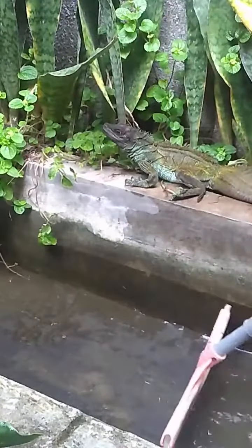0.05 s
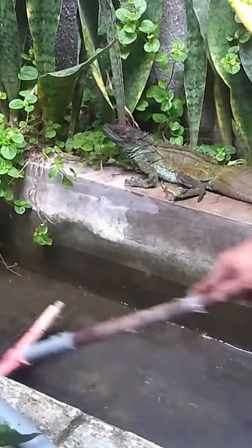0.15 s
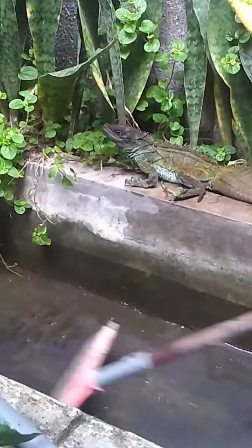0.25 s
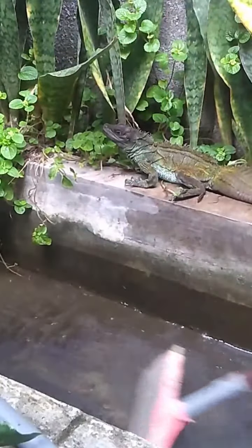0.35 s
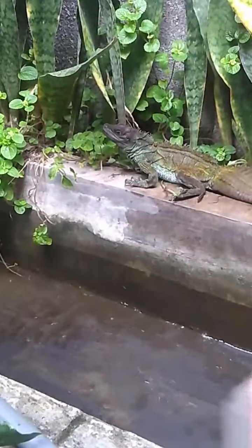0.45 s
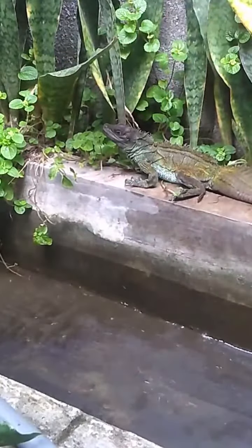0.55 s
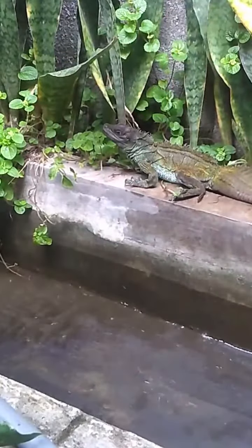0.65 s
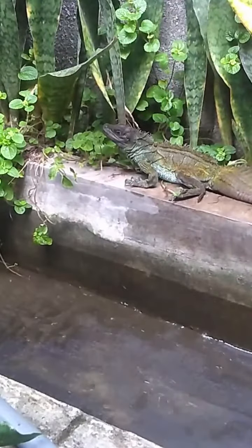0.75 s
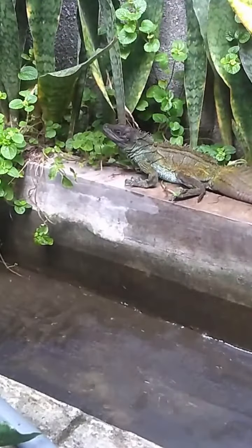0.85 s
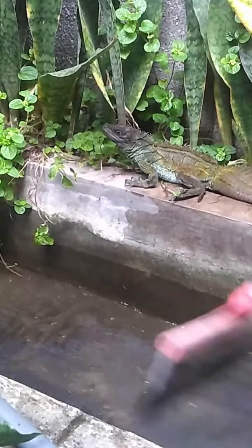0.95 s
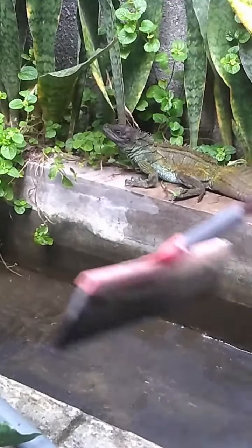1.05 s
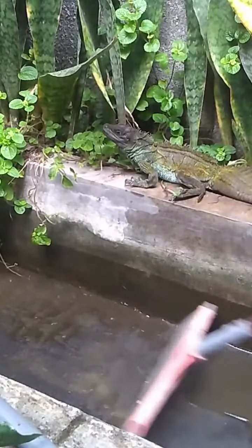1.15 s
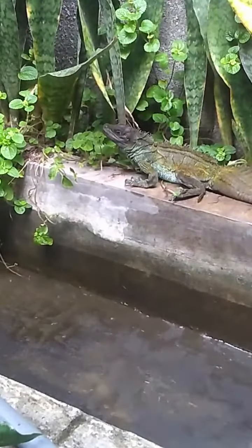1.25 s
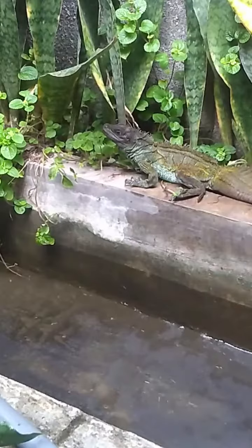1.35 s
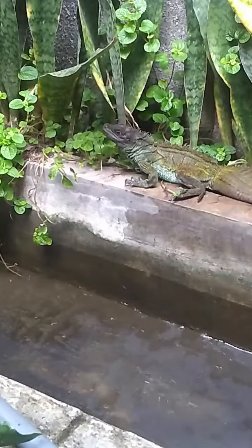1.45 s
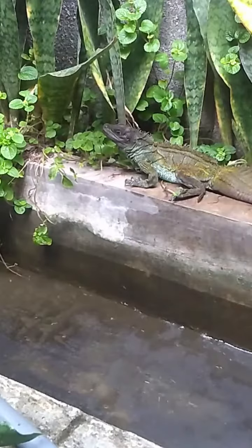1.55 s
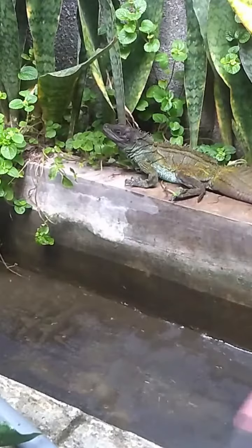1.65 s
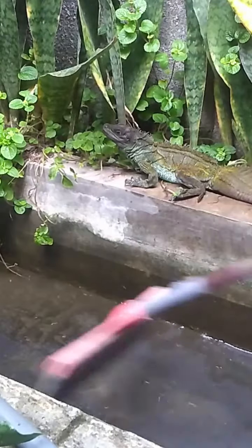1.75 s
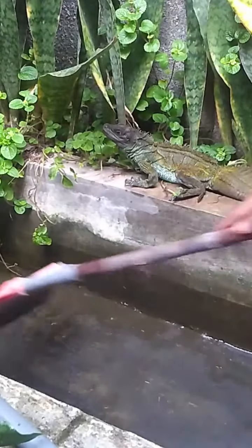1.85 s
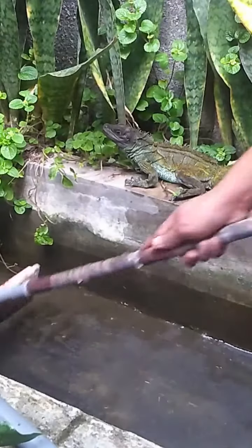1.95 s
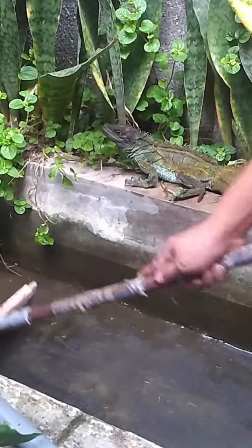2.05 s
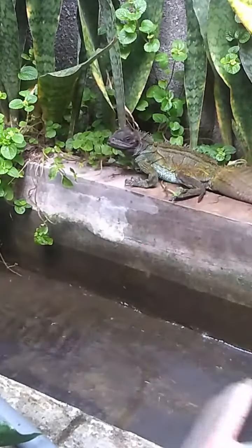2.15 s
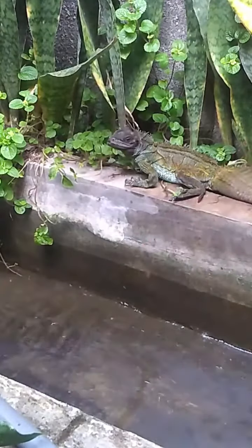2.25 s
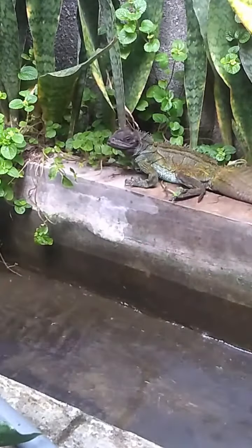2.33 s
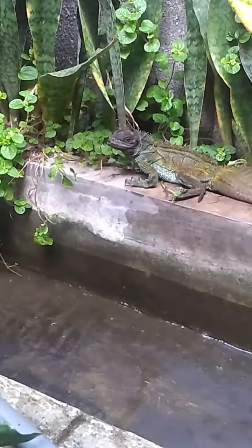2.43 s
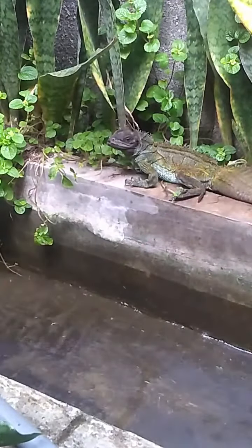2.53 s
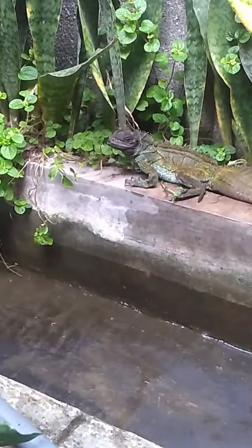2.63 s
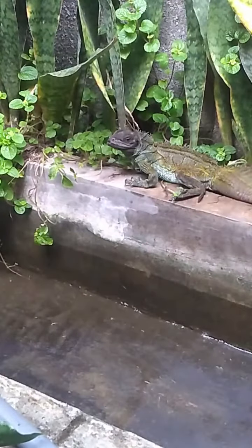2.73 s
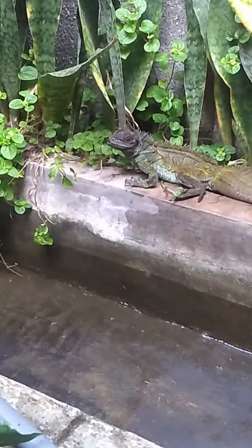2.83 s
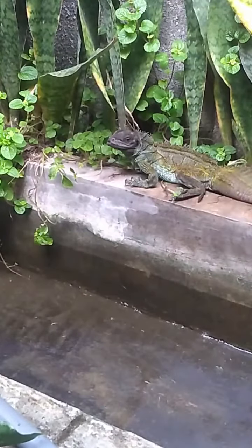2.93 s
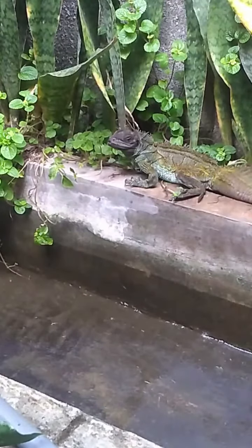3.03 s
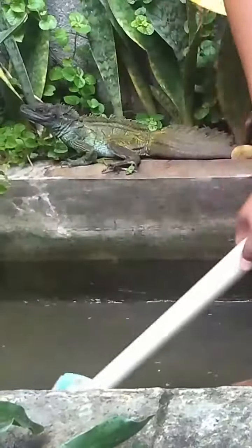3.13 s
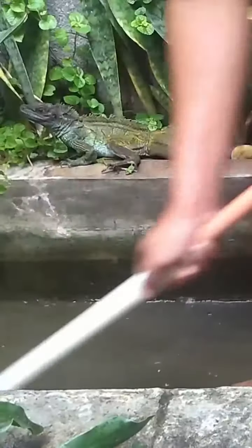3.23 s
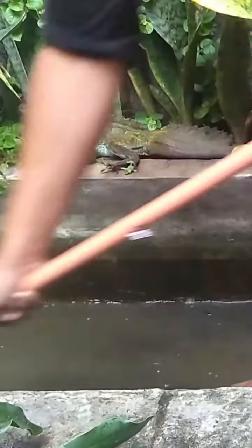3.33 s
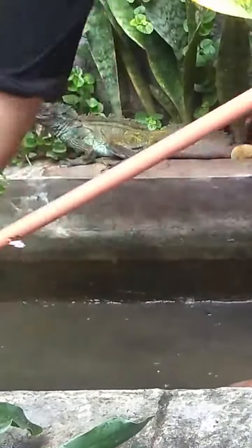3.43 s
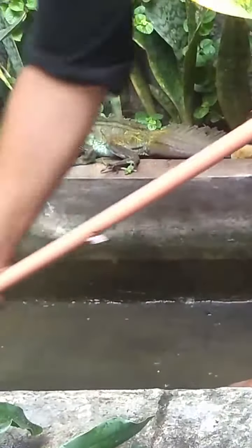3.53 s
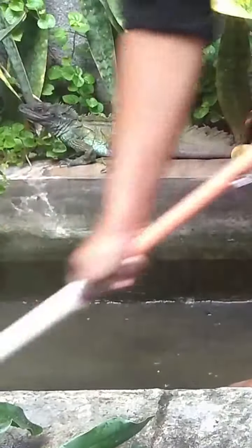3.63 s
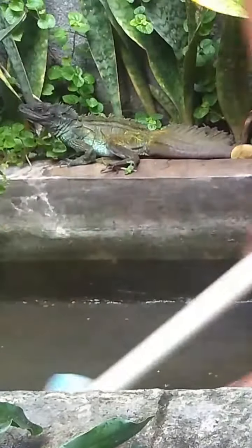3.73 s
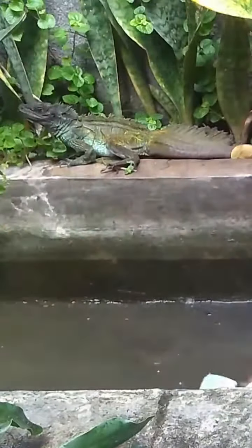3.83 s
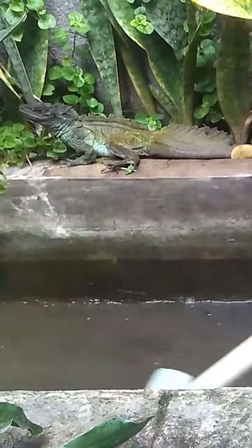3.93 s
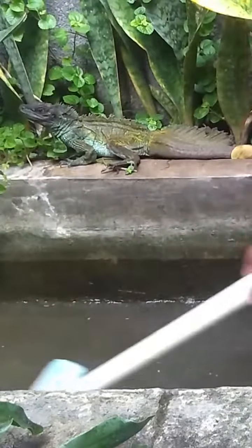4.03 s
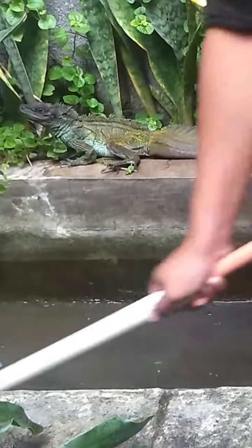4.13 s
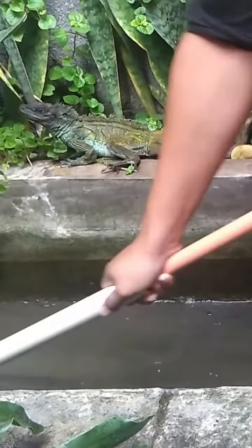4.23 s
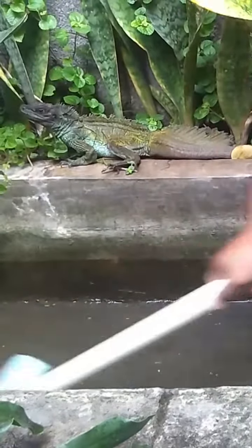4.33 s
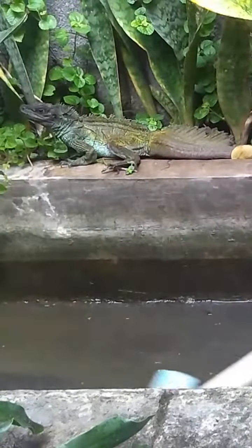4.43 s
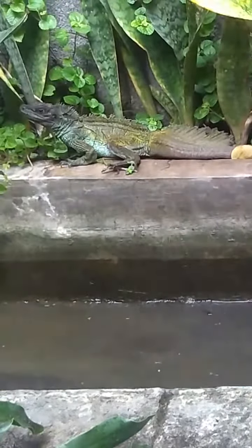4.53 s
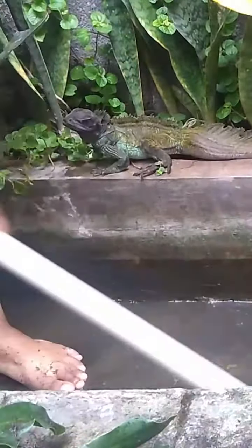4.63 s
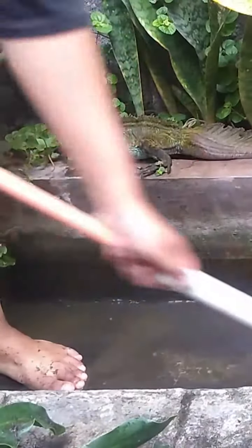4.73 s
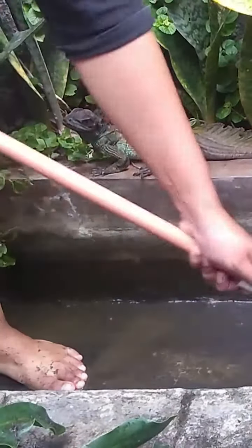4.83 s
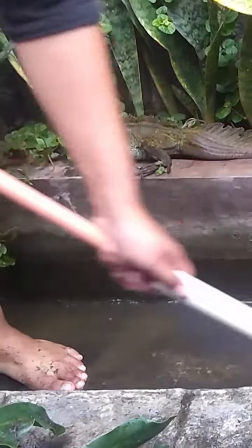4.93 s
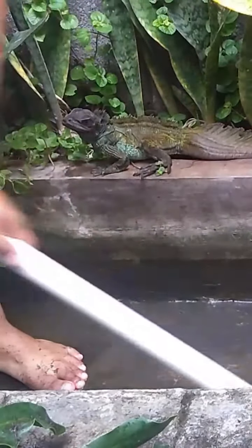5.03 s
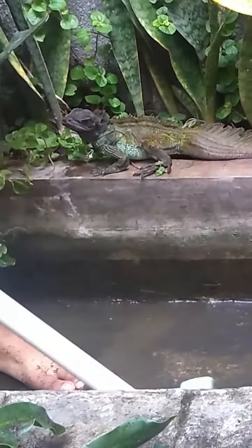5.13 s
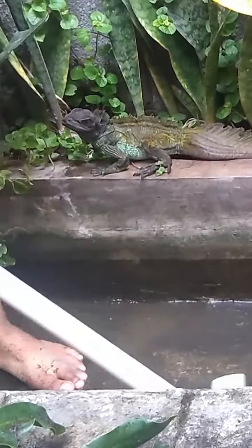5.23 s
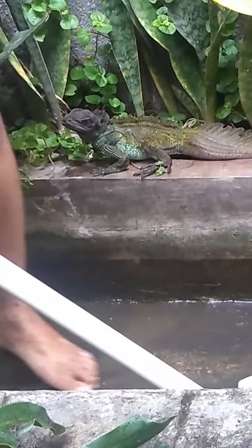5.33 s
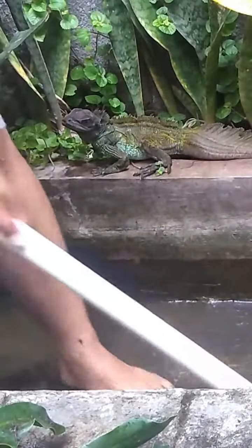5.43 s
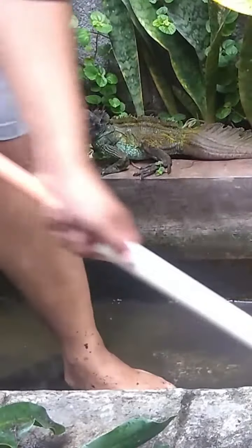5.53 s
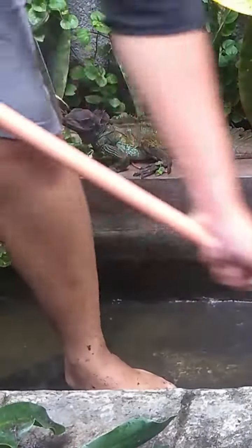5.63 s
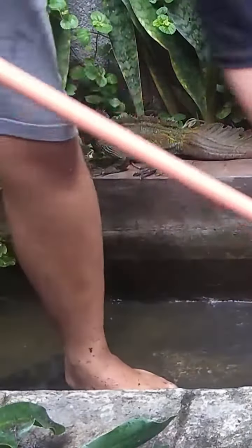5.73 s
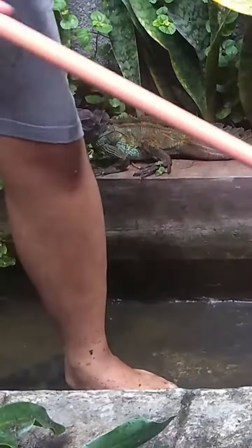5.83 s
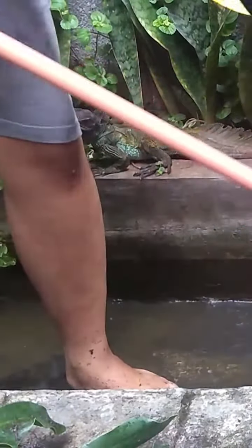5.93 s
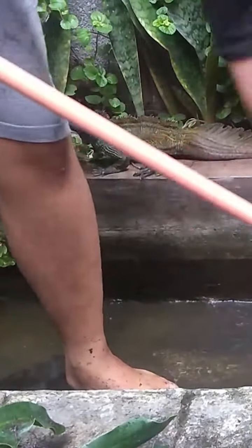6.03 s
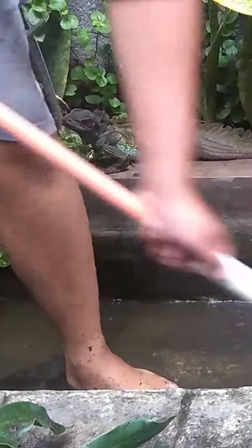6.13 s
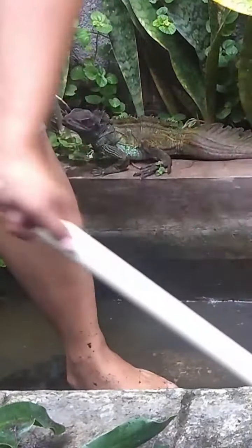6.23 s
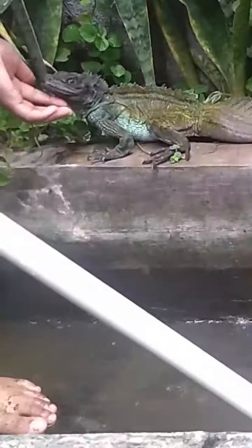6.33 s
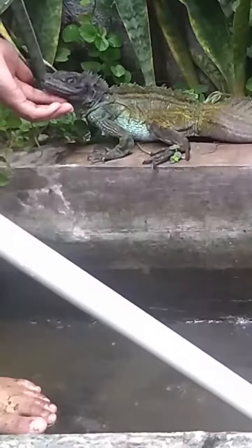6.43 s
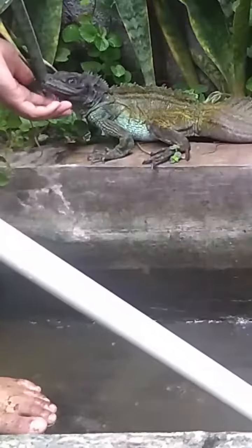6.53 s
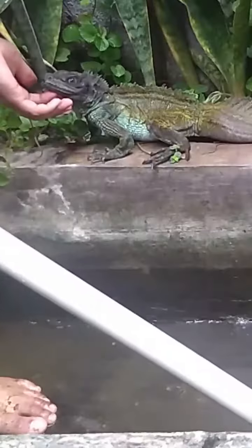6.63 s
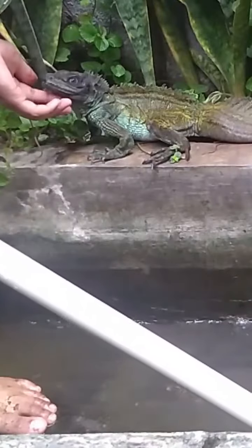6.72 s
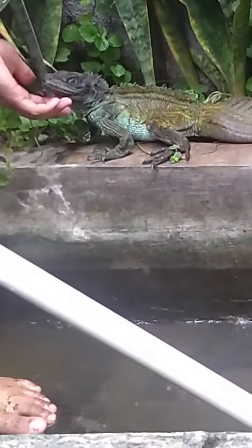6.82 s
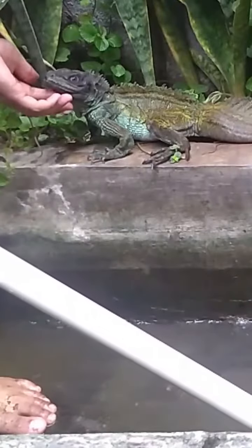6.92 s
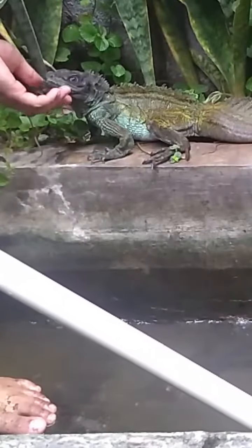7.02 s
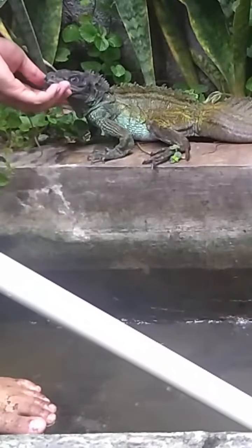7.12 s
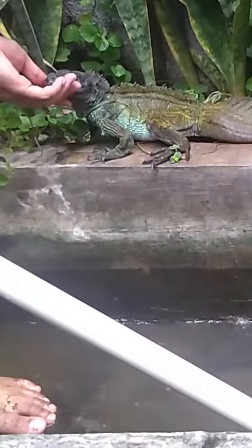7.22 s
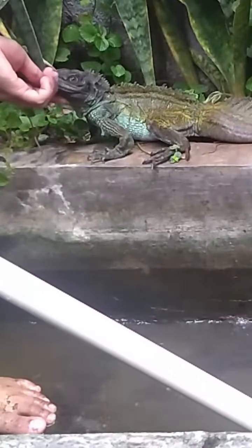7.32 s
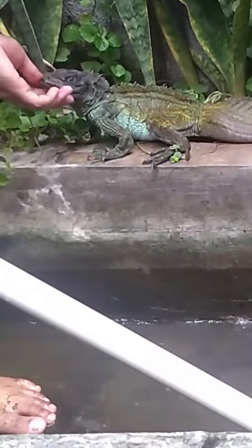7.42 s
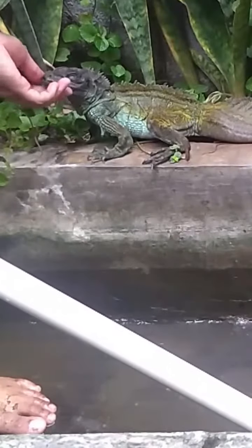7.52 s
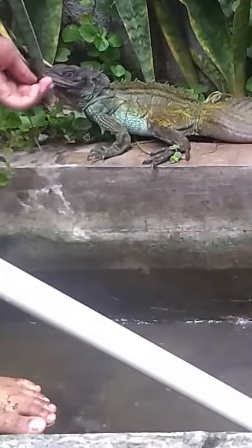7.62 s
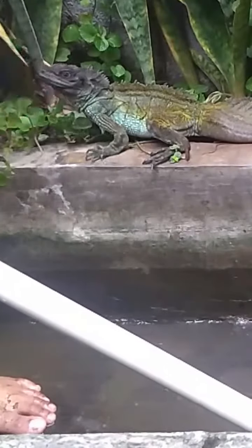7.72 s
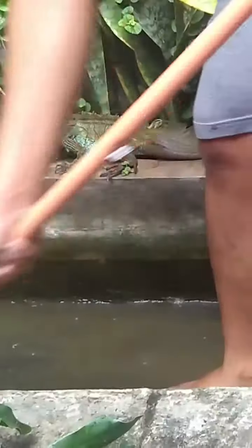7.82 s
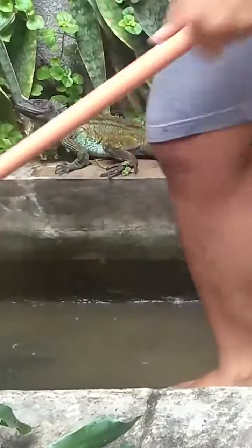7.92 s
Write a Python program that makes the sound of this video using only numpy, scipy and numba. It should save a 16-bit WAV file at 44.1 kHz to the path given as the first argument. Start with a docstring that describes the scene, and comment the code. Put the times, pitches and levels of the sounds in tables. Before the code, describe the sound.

Rough scratching ticks and gritty drags come first, broken by a bright water slap, dull head knocks and low trough rumble. Brief near-silent gaps separate the passages. Then cleaner, bristly swishes scrub wet concrete back and forth, very close to the microphone. A long faint hush follows, with soft rumbling and light taps, before a sudden final rasp.

```python
"""Dense scratching ticks are heard first, with drags, knocks and splashes over a low boom.
A long-handled scraper blade, then a brush, works over the wet concrete of a drained pond near two microphone ports.
Random impulses stand for stick-slip; filtered noise excites the head, the handle, the water and the trough.
The sound comes in passages separated by brief, nearly silent gaps."""
import sys
import numpy as np
from scipy import signal
from scipy.fft import rfft, irfft, next_fast_len
from scipy.io import wavfile
from scipy.ndimage import uniform_filter1d
from numba import njit

SR = 44100
rng = np.random.default_rng(int(sys.argv[2]) if len(sys.argv) > 2 else 0)


def wav_record(signal):
    """Record a signal, one row per channel, as 16-bit PCM in the file named by sys.argv[1]."""
    frames = np.transpose(np.atleast_2d(signal))
    bounded = np.clip(frames, -1, 1)
    # unit amplitude maps onto the largest positive 16-bit level
    quanta = np.round(bounded * 32767).astype(np.int16)
    wavfile.write(sys.argv[1], SR, quanta)


N = 351477

# Strokes of the blade, then of the brush: (landing time [s], hiss on landing [dB], swell [s], top hiss [dB],
# hold [s], fall [dB/s], strongest rasp over hiss [dB], place of that rasp [share of stroke],
# drag over hiss on landing [dB], drag over hiss at the end [dB], port balance [dB, quarter to each port])
STROKES = [ (0.0, -52, 0.028, -56, 0.049, 150, 5.5, 0.32, -2.5, -6, -5),
           (.125, -54, 0.05, -32, 0.0039, 44.4, 2, 0.49, -1, 15, 3.5),
           (0.488, -39, 0.015, -40, 0.018, 61, -11, 0.07, 8, -14, -4.5),
           (.56, -49.5, 0.16, -40, 0.064, 49.6, -14.5, .05, -2, -22, -2),
           (.98, -54.5, 0.097, -52, 0.0031, 706, 12.5, 0.58, 8, 25.5, 3.5),
           (1.157, -49, 0.12, -46.5, 0.03, 110, -2, 1, -8, 0, -7),
           (1.373, -58.5, 0.21, -38.5, 0.035, 200, -6, 0.15, 1.5, -13, -0.5),
           (1.64, -39, 0.0061, -36.5, 0.032, 178, 1, 0.71, -5, 0.5, 2),
           (1.78, -57, 0.033, -61, 0.07, 150, 3, .4, 2.5, 1.5, -2),
           (1.93, -48.5, 0.008, -49.5, .01, 80, 1.5, 0.41, -2, 2, -6),
           (2.059, -75, 0.036, -46, 0.0018, 900, -14, .05, -12, -6, -12),
           (2.155, -61, 0.028, -38, 0.026, 110, -13, 0.87, 4, -1, -1),
           (2.28, -50.5, 0.12, -48, .005, 200, -4, 0.32, 6.5, 2.5, -2.5),
           (2.431, -47.5, 0.13, -39, .005, 200, -0.5, 0.5, 6.5, 5.5, -2),
           (2.6, -52.5, 0.074, -46.5, .01, 200, -3, .05, -6, -6, -6),
           (2.705, -44.5, 0.014, -39, 0.0084, 171, -17, .8, -3.5, -3, -4),
           (2.801, -53, 0.062, -28.5, 0.027, 400, 2, 0.62, -31, 3, 4.5),
           (2.929, -50.5, 0.072, -46.5, 0.004, 196, 8, .1, -0.5, -3.5, 1),
           (3.125, -39.5, 0.0038, -33.5, 0.044, 207, -2.5, 0.65, -15.5, -7.5, -2),
           (3.282, -45.5, 0.07, -29, 0.1, 177, -5, 0.76, -11, -36, -3),
           (3.587, -47, 0.17, -30.5, 0.0045, 103, -10, 0.72, -13.5, -21, -4.5),
           (3.84, -43, 0.043, -34, 0.022, 287, 1.5, 0.74, -24.5, 0.5, -0.5),
           (4.007, -46, 0.059, -38, 0.11, 199, -5, 0.29, -14.5, -11.5, -3),
           (4.2, -41, 0.1, -36.5, 0.0091, 190, -9, 0.15, -10.5, -19, -3.5),
           (4.384, -40.5, 0.14, -34, .03, 453, -13, 0.78, -16, -12.5, -4),
           (4.624, -41, 0.077, -31, 0.18, 168, -2, 0.58, -12.5, -29.5, -1.5),
           (4.985, -41, 0.06, -39, 0.05, 150, -9, .5, -13, -11, -3),
           (5.1, -46, .045, -33.5, .095, 210, -9, .9, -14, -10, -2),
           (5.289, -57.5, 0.033, -44, 0.039, 108.6, -9, 0.55, -11, -7.5, -2),
           (5.477, -46.5, 0.27, -29.5, 0.18, 175, -4.5, 0.55, -10, -22, -1.5),
           (6.035, -39, 0.061, -33.5, 0.17, 890, -13, 0.81, -11, -20, -4),
           (7.828, -38.5, 0.082, -24, 0.028, 100, -9.5, 0.45, -12.5, -33, 0), ]
# Faint hiss while the brush rests: (time [s], hiss [dB], drag over hiss [dB],
# port balance [dB, quarter to each port])
RESTING = [(6.33, -95.5, -1.5, 2), (6.39, -85, -4, 0), (6.465, -87, 1.5, -2), (6.48, -77, 2, -2.5),
           (6.52, -75, 1.5, -2), (6.65, -79, 1, -1), (6.69, -87, 1.5, -0.5), (6.728, -86, -0.5, -0.5),
           (6.74, -75, 0.1, -0.5), (6.79, -73.5, -2, -1), (6.91, -85.5, -3.5, 1.5), (7.01, -71.5, -2.5, 1),
           (7.13, -78, 0, -2.5), (7.224, -71.5, -0.5, -2), (7.436, -66, -5.5, 6), (7.542, -71, 2, -3),
           (7.62, -64, 2, 12), (7.708, -71.5, -13, 18), (7.748, -67.5, -13, 5.5), (7.79, -88, -7, -0.5)]
# Spectrum of the bristle slips: (frequency [Hz], relative level [dB])
BRISTLE_SPECTRUM = [(1350, -32.5), (2200, -2.5), (2750, 4.5), (3130, 2.5), (4300, 3.5), (7160, -1.5),
                    (11700, -10.5), (14900, -25), (15600, -41), (16000, -81)]
# Spectrum of the blade's crackle: (frequency [Hz], relative level [dB])
BLADE_SPECTRUM = [(1200, -40), (1900, -7), (2600, -0.5), (3100, -4), (3720, -3), (4650, -5), (5480, -5.5),
                  (8460, -9.5), (11300, -16), (13900, -24.5), (14900, -33), (16000, -43)]
# Spectrum of the head dragging through grit: (frequency [Hz], relative level [dB])
DRAG_SPECTRUM = [(250, -54), (420, -18.5), (572, 2), (804, 3), (949, -8), (1110, 0), (1500, -4),
                 (1950, -12.5), (3300, -60)]
# Resonances of the head: (frequency [Hz], width before broadening [Hz], relative level [dB])
HEAD_MODES = [(225.7, 33, -4.5), (372.4, 27, -4.5), (483.5, 45, 1), (651, 30, 4), (821, 16, -2.5),
              (890, 50, -2.5), (970, 165, 0), (1069, 11, 5), (1371, 58, -3), (1522, 47, -2.5)]
# Head knocking and juddering on concrete: (time [s], peak [dB], centre of the ring [Hz],
# t60 of the contact [s], fall away from the centre [dB/octave])
KNOCKS = [(.114, -39.5, 1550, 0.031, 38.5), (.429, -20, 455, 0.13, 43), (.468, -21, 482, 0.26, 31),
          (.519, -23.5, 810, 0.072, 44.5), (.93, -27, 1440, 0.14, 48), (1.025, -25.5, 1070, 0.1, 33.5),
          (1.061, -25.5, 1070, 0.12, 81), (1.158, -21.5, 223, 0.025, 25), (1.555, -22.5, 427, 0.14, 16.5),
          (1.577, -25, 445, 0.072, 37.5), (1.663, -27, 646, 0.086, 36), (1.783, -33.5, 970, 0.21, 39),
          (1.899, -39, 1580, 0.046, 7), (2.093, -32, 696, 0.041, 19.5), (2.153, -21, 710, 0.2, 25.5),
          (2.43, -32, 1000, 0.31, 9), (2.524, -27, 1200, 0.13, 17), (2.553, -27.5, 1060, 0.11, 25),
          (2.859, -23, 1410, 0.33, 17), (2.893, -29, 1030, .14, 25), (2.88, -35.5, 650, 0.3, 33.5),
          (4.071, -36.5, 960, 0.22, 18), (5.038, -30, 800, .04, 110), (5.045, -14, 480, 0.053, 30)]
# Slaps and splashes: (time [s], peak [dB], pitch [Hz], t60 of the tail [s], band width over pitch, held to 0.1-3)
SPLASHES = [(0.1155, -36, 4140, 0.029, 0.44), (0.1502, -24, 4270, 0.067, 3.3),
            (0.165, -18, 3760, 0.08, 0.75), (0.1787, -5, 3960, 0.042, 0.96),
            (0.266, -27, 5180, 0.057, 0.84), (0.32, -26, 5240, 0.054, 0.98),
            (0.845, -24.5, 3840, 0.12, 0.21), (1.643, -21, 2990, 0.057, 0.39), (1.9305, -43, 3600, 0.11, 1),
            (2.0977, -28, 6900, 0.091, 0.82), (2.109, -18, 7460, 0.006, 1.9),
            (2.4294, -36.5, 3920, 0.46, 1.2), (2.5226, -27, 2920, 0.065, 1), (2.703, -31, 3890, 0.093, 2.4),
            (2.7594, -39, 3700, 0.051, 1.6), (2.82, -32, 3000, 0.033, 0.27),
            (2.842, -19.5, 3300, 0.17, 0.75), (4.006, -34, 3870, 0.042, 1), (7.595, -45, 2860, 0.099, 0.6)]
# Thin squeaks of the wet edge: (time [s], peak [dB], pitch [Hz], t60 [s])
SQUEAKS = [(.77, -35.5, 3520, 0.16), (0.812, -32.5, 3420, 0.064), (0.923, -30.5, 2850, 0.19),
           (1.069, -33.5, 3640, 0.066), (2.03, -37, 2620, 0.22)]
# The resting handle taps the wall: (time [s], peak [dB], t60 of the contact [s], tilt of the ring [dB/octave])
TAPS = [(7.596, -38.5, 0.073, 2), (7.634, -37.5, .09, -1), (7.672, -50.5, .05, 0.1), (7.725, -52, 0.13, 7)]
# Resonances of the handle: (frequency [Hz], width before broadening [Hz], relative level [dB])
HANDLE_MODES = [(863, 49, 0), (991, 50, -2), (1585, 55, -10), (1760, 53, -6), (2480, 120, -9),
                (2860, 70, -8), (3640, 63, -20), (4330, 60, -17), (5000, 120, -26), (5530, 54, -22)]
# Faint dry ticks in the quiet: (time [s], peak [dB])
FAINT_TICKS = [(6.336, -72), (6.349, -76), (6.389, -72), (6.455, -68), (6.646, -66), (6.702, -62.5),
               (6.934, -70)]
# Low sounds, one list a stretch: (time [s], rumble [dB], slosh over rumble [dB], upper over lower boom [dB])
LOW_LEVELS = [
    [(0.0, -54, -21, -8), (0.052, -51.5, -35, -16), (0.118, -55, -41, 0.5), (0.146, -35, -0.5, 0),
     (0.446, -30, -5, 10), (0.604, -41.5, -3, -2), (0.756, -41.5, 6, 2), (0.872, -31.5, -13.5, 6),
     (0.906, -42, -6, 10), (0.958, -34.5, -6, 14), (1.125, -57, 9.5, 2)],
    [(1.155, -39, -5.5, 7), (1.221, -47.5, -12.5, -4), (1.463, -52.5, -5.5, 2), (1.521, -47, -15, 5),
     (1.567, -57, 4, 6), (1.621, -48, -18, 3), (1.779, -56.5, -1, 16), (1.845, -42.5, -15, 7),
     (1.929, -42, -8.5, 1), (2.111, -34, -3, 10), (2.125, -59, -10, -2)],
    [(2.155, -27.5, -5.5, -3), (2.217, -26.5, -7.5, -16), (2.261, -41, -1.5, -5), (2.401, -48.5, -6.5, 1),
     (2.437, -37, -7, 4), (2.735, -53.5, 0, -15), (2.849, -47, -10, 26), (2.909, -55, -1, -15),
     (2.991, -58, -23, -27), (3.059, -55.5, -2, -10), (3.1, -76, 7, -1)],
    [(3.125, -83, -2, 5), (3.707, -87, -1, 0), (3.757, -72, -27, -1), (3.801, -85, -2, 4),
     (4.159, -83.5, 4, 3), (4.281, -66, -35, -2), (4.335, -79.5, 1, 6), (4.405, -66, -24, -7),
     (4.471, -87, -2, 0.5), (4.565, -69, -6, -1), (4.6, -80.5, -27, 0.5)],
    [(4.63, -92, 20, -4), (4.826, -57, -24, -20), (4.98, -83, 15, -1), (5.078, -55, 6.5, -14),
     (5.294, -56.5, -28, -15), (5.444, -70, -1.5, -10), (5.48, -53, -17, -21), (6.046, -88, 18, -10.5),
     (6.14, -65, -32.5, -6), (6.266, -76.5, -5, -6), (6.31, -97, -11, 1.5)],
    [(6.33, -97.5, -0.5, 5), (6.46, -99, 3.5, -1.5), (6.526, -73, 0, -2), (6.722, -99, 4, -1.5),
     (6.804, -76, -4.5, -1), (6.87, -76, -6.5, 0.5), (6.9, -97.5, -1, 2), (7.022, -70, 0, 3),
     (7.092, -72.5, -17, 0), (7.122, -77, -5, -1.5), (7.2, -77, -5, -1)],
    [(7.22, -68, -17, 5), (7.258, -58, -8.5, 19), (7.31, -60, -17, 21), (7.408, -46.5, -9.5, 13),
     (7.44, -45.5, -13, -6), (7.482, -54, -17, 9), (7.512, -47.5, -12, 17), (7.568, -54, -2.5, 12),
     (7.656, -39.5, -15.5, 21), (7.69, -44.5, -16, 20), (7.736, -56, 11.5, -1), (7.788, -82, 6, 0.5),
     (7.834, -48.5, 3, 5), (7.97, -59.5, 2, 4)],
]
# Spectrum of the rumble: (frequency [Hz], relative level [dB])
RUMBLE_SPECTRUM = [(18, -61.5), (30, -30), (53, -14.5), (97, -6), (130, -4), (184, -3), (260, -8.5),
                   (340, -43.5), (570, -120)]
# Air resonances of the trough: (frequency [Hz], width of the band-pass, applied twice [Hz])
TROUGH_MODES = [(139, 20), (182, 15)]
# Spectrum of the even air hiss: (frequency [Hz], relative level [dB])
AIR_SPECTRUM = [(240, -32), (400, -5), (520, -18), (1870, -16), (2400, -12), (2670, -13.5), (16000, -25)]
# Likeness of the two channels by frequency: (frequency [Hz], likeness [1 in step, -1 opposed])
LIKENESS = [(400, .2), (700, .55), (1100, .85), (1680, .01), (2000, -.6), (2100, -.97), (2150, -.9995),
            (2450, -.9995), (2510, -.95), (2650, -.5), (2950, .01), (3250, .9), (3330, .995), (3560, .995),
            (3680, .8), (4080, .01), (4650, -.6), (5200, .01), (5900, .45), (6900, -.45), (7800, .01)]
# Stretches of full likeness weighting, where the sound turns hollow: (start [s], end [s])
HOLLOW = [(.42, 1.08), (1.17, 1.22), (1.48, 1.62), (2.13, 2.48), (2.54, 2.82), (2.9, 3.0), (3.13, 3.19),
          (3.28, 3.33), (3.63, 3.76), (4.4, 4.5), (4.63, 4.7), (4.97, 5.06), (5.36, 5.44), (5.46, 5.61),
          (6.05, 6.11), (6.38, 6.45), (7.82, 7.88)]
# Passages at full gain: (start [s], end [s])
PASSAGES = [(0.0, 1.125), (1.155, 2.125), (2.155, 3.1), (3.125, 4.6), (4.63, 6.31), (6.33, 6.438),
            (6.455, 6.685), (6.7, 6.915), (6.933, 7.79), (7.825, 7.97)]
# Response of the two ports: (frequency [Hz], left minus right [dB])
PORT_BALANCE = [(60, 2), (110, 2.5), (200, 2), (380, 3), (700, 1), (1290, 0.5), (2100, 0), (3700, 0),
                (4400, -.5), (8120, -3), (15000, -5)]

TICKS_PER_S, TICK_SPREAD_DB = 20000, 0.5
BLADE_UNTIL_S = 3.11
PORT_LAG_S, BRISTLES_ALIKE, HEAD_ALIKE = .00036, 0.02, 0.05  # alike: share of power common to the ports
RASP_HZ, RASP_WIDTH_HZ = 1960, 2060
RASP_SWING_DB, RASP_SPAN = 9, 0.18  # sinking away from the strongest rasp; its width as share of the stroke
RESTING_RASP_DB = -1  # over the hiss
LANDING_S, SPENT_DB = 0.011, 18  # ramp ahead of the landing; fall that counts as the end of a stroke
SLOSH_HZ, SLOSH_WIDTH_HZ = 336, 282
FAINT_TICK_HZ, FAINT_TICK_T60_S = 1498, .03
MURMUR_HZ, MURMUR_WIDTH_HZ = 1139, 300
MURMUR_DB, MURMUR_S = -7.5, (6.33, 7.2)  # level over the hiss; start and end
BOOM_DB = -7.5  # mean of the two boom levels over the rumble
AIR_DB, HUM_DB = -72.5, -84.5
HOLLOW_EDGE_S, USUAL_SHARE = .012, .7  # share of the likeness kept outside the hollow stretches
LOUD_DB, LOUD_SPAN_DB, LOUD_LATE_S, LOUD_SHARE = -40, 3, .08, .15  # share kept after loud hiss
FADE_IN_S, FADE_OUT_S, GAP_DB = 0.0099, 0.01, -38
TOP_HZ = 15600


def undb(db):
    """Decibels to amplitude ratio."""
    return 10 ** (np.asarray(db) / 20)


def unit(x):
    """Normalisation to unit root mean square."""
    return x / np.sqrt(np.mean(x ** 2))


def on_log(table, hz):
    """Interpolation of (frequency, value) points on a logarithmic frequency axis."""
    f, v = np.transpose(table)
    return np.interp(np.log(hz), np.log(f), v)


def curve(rows):
    """Linear interpolation of a table's columns over time, one value a sample."""
    s, *columns = np.transpose(rows)
    return [np.interp(np.arange(N) / SR, s, c) for c in columns]


@njit
def svf(x, hz, width):
    """Second-order resonance: a state-variable band-pass with gain 1 at the centre."""
    y, band, low = np.empty(len(x)), 0., 0.
    g, k = np.tan(np.pi * hz / SR), width / hz
    for i in range(len(x)):
        v = (band + g * (x[i] - low)) / (1 + g * (g + k))
        band, low, y[i] = 2 * v - band, low + 2 * g * v, k * v
    return y


def steep(x, hz, width):
    """Cascaded resonance: the same band-pass twice on each channel, for steeper skirts."""
    return np.array([svf(svf(c, 1. * hz, 1. * width), 1. * hz, 1. * width) for c in x])


def walk(rate):
    """Slow random modulation: levels held 1 / rate s, then averaged twice; spread near 1."""
    k = int(SR / rate)
    held = np.repeat(rng.standard_normal(N // k + 1), k)
    return 1.77 * uniform_filter1d(uniform_filter1d(held, k), k)[:N]


def ticks(rate, spread_db):
    """Stick-slip as random impulses: irregular slips of either sign, a few larger than the rest."""
    slips = (rng.random(N) < rate / SR) * rng.standard_normal(N)
    return slips * undb(spread_db * np.minimum(rng.exponential(size=N), 4))


def at_ports(draw, alike, lag_s):
    """Partial coherence: a shared part, late at the left port, plus an independent part at each port."""
    shared, alike = draw(), np.clip(alike, 0, 1)
    late = np.roll(shared, int(lag_s * SR))
    own = np.array([draw(), draw()])
    return np.sqrt(alike) * np.array([late, shared]) + np.sqrt(1 - alike) * own


def colour(x, spectrum, step, flicker_db, rate):
    """Spectral shaping in overlapping bands, step octaves apart, each flickering independently."""
    size = next_fast_len(N)
    hz = np.arange(size // 2 + 1) * SR / size + 1
    shaped = rfft(x, size) * undb(on_log(spectrum, hz))
    place = np.log2(hz / spectrum[0][0]) / step
    last = int(np.log2(spectrum[-1][0] / spectrum[0][0]) / step) + 1
    total = 0
    for k in range(last + 1):
        band = irfft(shaped * np.clip(1 - np.abs(place - k), 0, 1), size)[:, :N]
        total = total + undb(flicker_db * walk(rate)) * band
    return unit(total)


def contact(t60, rise_s):
    """Impact excitation: noise force with a quick rise and exponential decay, mostly independent at the ports."""
    t = np.arange(SR // 3) / SR
    noise = rng.standard_normal((3, len(t)))
    decay = np.exp(-np.log(1000) * t / max(t60, .005))
    return (noise[0] + 3 * noise[1:]) * (1 - np.exp(-t / rise_s)) * decay


def add(out, s, db, sound):
    """Superposition: add an event at its time, scaled to its peak level."""
    i = int(s * SR)
    out[:, i:i + sound.shape[1]] += (undb(db) * sound / np.abs(sound).max())[:, :N - i]


def strokes():
    """Power addition of strokes that land, swell, hold and fall; gives hiss, rasp, drag and balance curves."""
    t = np.arange(N) / SR
    still_db, still_drag_db, still_pan_db = curve(RESTING)
    resting = (t > RESTING[0][0] - LANDING_S) & (t < RESTING[-1][0] + LANDING_S)
    hiss = undb(2 * still_db) * resting + 1e-12  # doubled decibels give power
    rasp = hiss * undb(2 * RESTING_RASP_DB)
    drag = hiss * undb(2 * still_drag_db)
    pan = hiss * still_pan_db  # balance weighted by power
    for s, land_db, swell, top_db, hold, fall, rasp_db, rasp_at, drag_db, end_drag_db, pan_db in STROKES:
        start = max(int((s - LANDING_S) * SR), 0)
        now = slice(start, int((s + swell + hold + 3 * SPENT_DB / fall) * SR))
        age = t[now] - s
        db = np.interp(age, [0, swell], [land_db, top_db]) - fall * np.maximum(age - swell - hold, 0)
        power = undb(2 * db) * np.clip(age / LANDING_S + 1, 0, 1) ** 2
        done = np.clip(age / (swell + hold + SPENT_DB / fall), 0, 1)
        sink_db = RASP_SWING_DB * (np.exp(-((done - rasp_at) / RASP_SPAN) ** 2) - 1)
        hiss[now] += power
        pan[now] += power * pan_db
        rasp[now] += power * undb(2 * (rasp_db + sink_db))
        drag[now] += power * undb(2 * (drag_db + (end_drag_db - drag_db) * done))
    return 10 * np.log10(hiss), 10 * np.log10(rasp / hiss), 10 * np.log10(drag), pan / hiss


def brush(hiss_db, rasp_db):
    """Stick-slip friction: coarse blade crackle, then dense bristle slips, both with a lower band of rasp."""
    slips = at_ports(lambda: ticks(TICKS_PER_S, TICK_SPREAD_DB), BRISTLES_ALIKE, PORT_LAG_S)
    crackle = at_ports(lambda: ticks(3000, 2.2), 0.02, PORT_LAG_S)
    bristles = colour(slips, BRISTLE_SPECTRUM, .6, flicker_db=1.6, rate=14) * undb(.45 * walk(40))
    blade = colour(crackle, BLADE_SPECTRUM, 0.2493, flicker_db=2.0, rate=30) * undb(1.3 * walk(45.1))
    rasp = steep(steep(slips, RASP_HZ, RASP_WIDTH_HZ), RASP_HZ, RASP_WIDTH_HZ)
    rasp = unit(rasp) * undb(1.603 * walk(30))
    tool = np.where(np.arange(N) / SR < BLADE_UNTIL_S, blade, bristles)
    return undb(hiss_db) * (tool + undb(rasp_db) * rasp)


def head(drag_db):
    """Friction-driven resonance: wet grit excites head modes whose levels come and go."""
    grit = at_ports(lambda: ticks(4000, 2.), HEAD_ALIKE, .0001)
    ring = 0
    for hz, width, db in HEAD_MODES[1:]:  # the lowest mode rings only under blows
        ring = ring + undb(db + 5.4 * walk(18)) * steep(grit, hz, 1.4 * width)
    scrape = colour(grit, DRAG_SPECTRUM, .4, flicker_db=2.5, rate=25)
    return undb(drag_db) * unit(scrape + undb(-6.5) * unit(ring))


def ring_modes(force, modes, trim_db, broaden):
    """Modal superposition: one contact force drives all resonances, each trimmed by its frequency."""
    return sum(undb(db + trim_db(hz)) * steep(force, hz, broaden * width) for hz, width, db in modes)


def knocks():
    """Modal excitation by impact: each knock favours the head resonances near its centre."""
    out = np.zeros((2, N))
    for s, db, centre_hz, t60, fall_db in KNOCKS:
        force = contact(t60, rise_s=0.0025)
        trim_db = lambda hz: -fall_db * abs(np.log2(hz / centre_hz))
        add(out, s, db, ring_modes(force, HEAD_MODES, trim_db, broaden=2.4))
    return out


def splashes():
    """Band-limited impact noise: a sharp crack and its tail, centred on the pitch of each slap."""
    out = np.zeros((2, N))
    for s, db, hz, t60, width in SPLASHES:
        force = contact(t60, rise_s=0.0021) + contact(0.0053, rise_s=0.00011)
        add(out, s, db, steep(force, hz, np.clip(width, .1, 3) * hz))
    return out


def squeaks():
    """Narrow-band resonance: the wet edge squeaks with a soft swell."""
    out = np.zeros((2, N))
    for s, db, hz, t60 in SQUEAKS:
        add(out, s, db, steep(contact(t60, rise_s=0.012), hz, 0.11 * hz))
    return out


def slosh(slosh_db):
    """Resonant response to random impulses: shallow water gurgles along the floor in short low lumps."""
    lumps = at_ports(lambda: ticks(300, 1.0), 0.59, .0004)
    gurgle = steep(steep(lumps, SLOSH_HZ, SLOSH_WIDTH_HZ), SLOSH_HZ, SLOSH_WIDTH_HZ)
    return undb(slosh_db + 1.3 * walk(25)) * unit(gurgle)


def taps():
    """Modal excitation of the handle by its taps on the wall."""
    out = np.zeros((2, N))
    for s, db, t60, tilt_db in TAPS:
        force = contact(t60, rise_s=.002)
        trim_db = lambda hz: tilt_db * np.log2(hz / HANDLE_MODES[0][0])
        add(out, s, db, ring_modes(force, HANDLE_MODES, trim_db, broaden=1.8))
    return out


def faint_ticks():
    """Broadly filtered noise bursts: short dry ticks in the quiet."""
    out = np.zeros((2, N))
    for s, db in FAINT_TICKS:
        force = contact(FAINT_TICK_T60_S, rise_s=.001)
        add(out, s, db, steep(force, FAINT_TICK_HZ, 3 * FAINT_TICK_HZ))
    return out


def murmur(hiss_db):
    """Narrow-band noise: a wavering murmur that follows the faint hiss while the brush rests."""
    t = np.arange(N) / SR
    band = unit(steep(rng.standard_normal((2, N)), MURMUR_HZ, MURMUR_WIDTH_HZ))
    sounding = (t > MURMUR_S[0]) & (t < MURMUR_S[1])
    return band * undb(hiss_db + MURMUR_DB + 2.53 * walk(20)) * sounding


def rumble(rumble_db, *boom_db):
    """Cavity resonance: a lumpy low rumble, partly different at each port, excites the air of the trough."""
    lumps = at_ports(lambda: rng.standard_normal(N) * undb(2.3 * walk(30)), 0.32, 0.00055)
    boom = sum(undb(db) * unit(steep(lumps, hz, width)) for db, (hz, width) in zip(boom_db, TROUGH_MODES))
    return undb(rumble_db) * (colour(lumps, RUMBLE_SPECTRUM, .5, flicker_db=2.5, rate=22) + boom)


def air(hiss_db):
    """Shaped stationary noise: a faint even hiss that sinks with the stroke hiss below its own level."""
    noise = colour(rng.standard_normal((2, N)), AIR_SPECTRUM, 2.0, flicker_db=-0.5, rate=15)
    return undb(np.minimum(hiss_db, AIR_DB)) * noise


def hum():
    """Low band-pass noise: a faint wavering rumble beneath the rest."""
    return undb(HUM_DB + 5.4 * walk(12)) * unit(steep(rng.standard_normal((2, N)), 55, 70))


def matched(x):
    """Inter-channel correlation: weigh sum and difference of the channels by the likeness of each band."""
    size = next_fast_len(N)
    hz = np.arange(size // 2 + 1) * SR / size + 1
    alike = np.clip(on_log(LIKENESS, hz), -.9995, .9995)
    left, right = rfft(x, size)
    weighed = [(left + right) * np.sqrt(1 + alike), (left - right) * np.sqrt(1 - alike)]
    mid, side = irfft(weighed, size)[:, :N] / 2
    return np.array([mid + side, mid - side])


def likeness_share(hiss_db):
    """Varying correlation: full in hollow stretches, else partial, and less shortly after loud brush hiss."""
    t = np.arange(N) / SR
    late_hiss_db = np.roll(hiss_db, int(LOUD_LATE_S * SR))
    loud = np.clip((late_hiss_db - LOUD_DB) / LOUD_SPAN_DB, 0, 1) * (t > BLADE_UNTIL_S)
    hollow = sum(np.clip(np.minimum(t - a, b - t) / HOLLOW_EDGE_S + 1, 0, 1) for a, b in HOLLOW)
    return np.clip(hollow, USUAL_SHARE - loud * (USUAL_SHARE - LOUD_SHARE), 1)


def passages():
    """Amplitude envelope: the gain opens ahead of each passage and closes after it."""
    t = np.arange(N) / SR
    rise = lambda x: np.clip(x + 1, 0, 1) ** 2
    gain = sum(rise((t - a) / FADE_IN_S) * rise((b - t) / FADE_OUT_S) for a, b in PASSAGES)
    return np.clip(gain, undb(GAP_DB), 1)


def scene():
    """Linear superposition of the near sources, weighted between the ports, and the background."""
    hiss_db, rasp_db, drag_db, pan_db = strokes()
    rumble_db, slosh_db, upper_db = curve(np.concatenate(LOW_LEVELS))
    near = brush(hiss_db, rasp_db) + head(drag_db) + knocks() + splashes() + squeaks()
    near = near + slosh(rumble_db + slosh_db) + taps() + faint_ticks() + murmur(hiss_db)
    near = near * undb(np.array([pan_db, -pan_db]) / 4)
    share = likeness_share(hiss_db)
    near = share * matched(near) + (1 - share) * near
    low = rumble(rumble_db, BOOM_DB - upper_db / 2, BOOM_DB + upper_db / 2)
    return passages() * (near + low + air(hiss_db) + hum())


def record(dry):
    """Port frequency response: more treble at the right, more bass at the left, and a steep top cut."""
    size = next_fast_len(N)
    tilt_db = on_log(PORT_BALANCE, np.arange(size // 2 + 1) * SR / size + 1)
    ports = irfft(rfft(dry, size) * undb(np.array([tilt_db, -tilt_db]) / 2), size)[:, :N]
    return signal.sosfilt(signal.ellip(8, .2, 70, TOP_HZ, fs=SR, output="sos"), ports)


dry = scene()
out = record(dry)
wav_record(out)
```